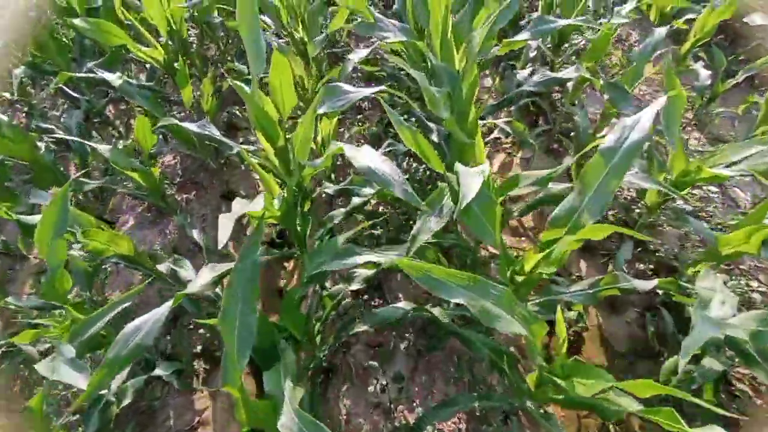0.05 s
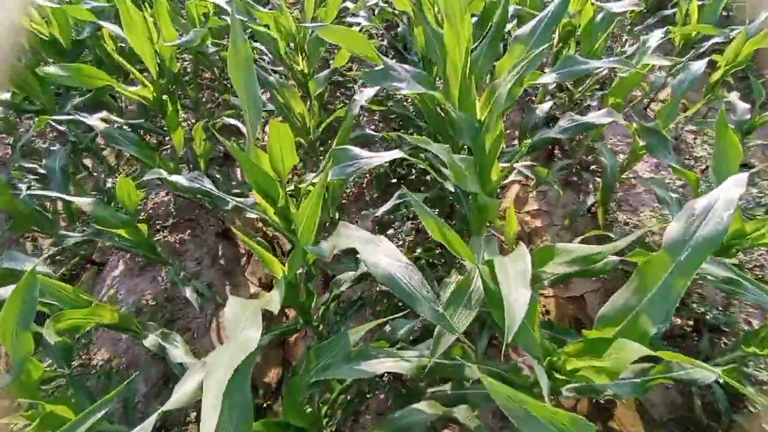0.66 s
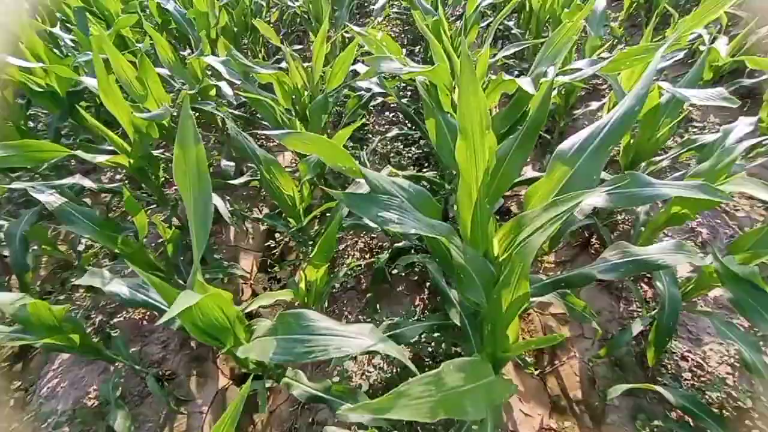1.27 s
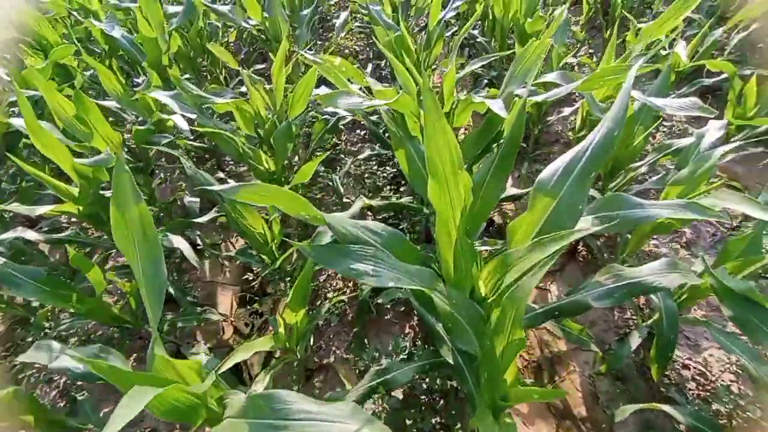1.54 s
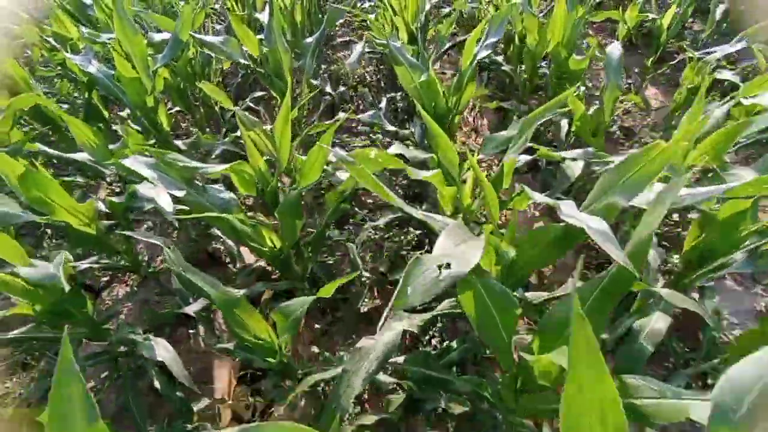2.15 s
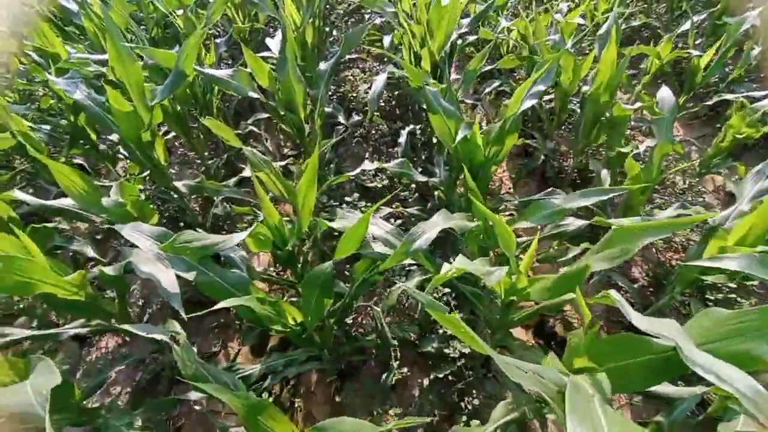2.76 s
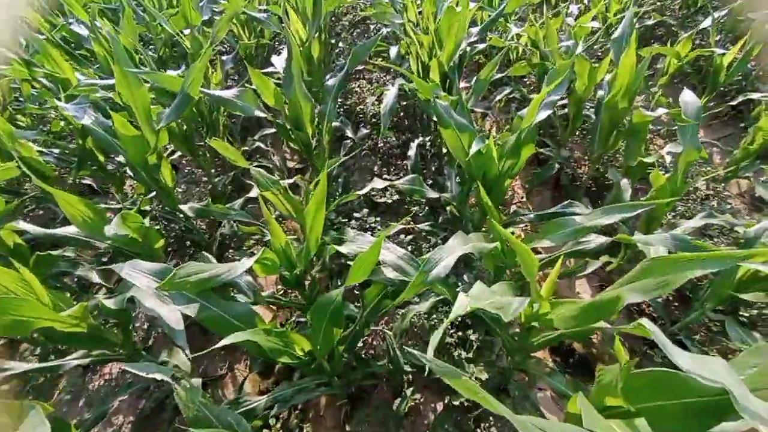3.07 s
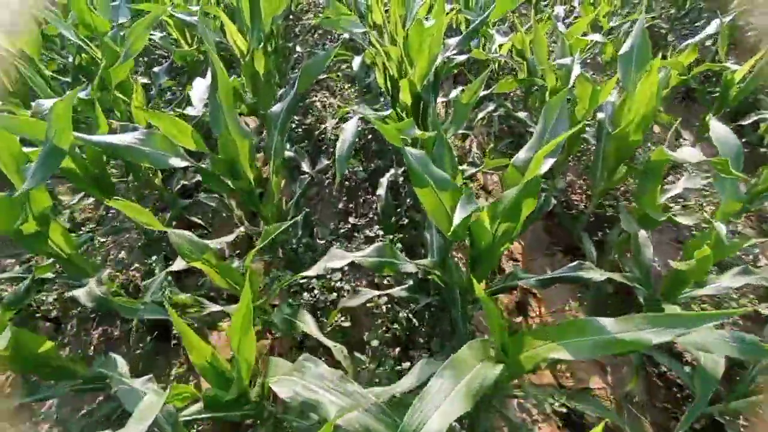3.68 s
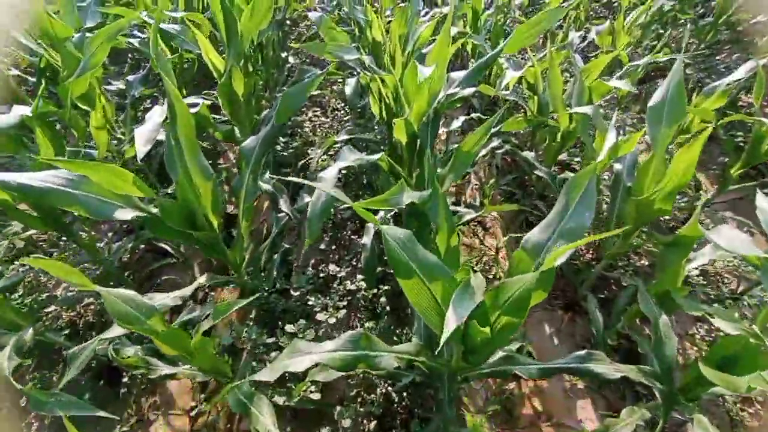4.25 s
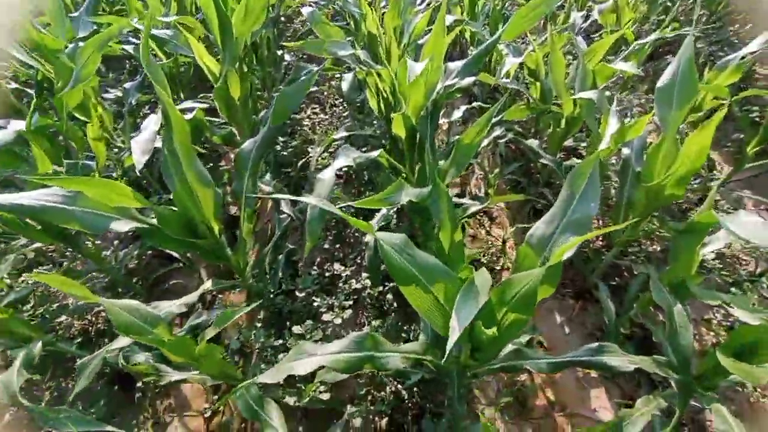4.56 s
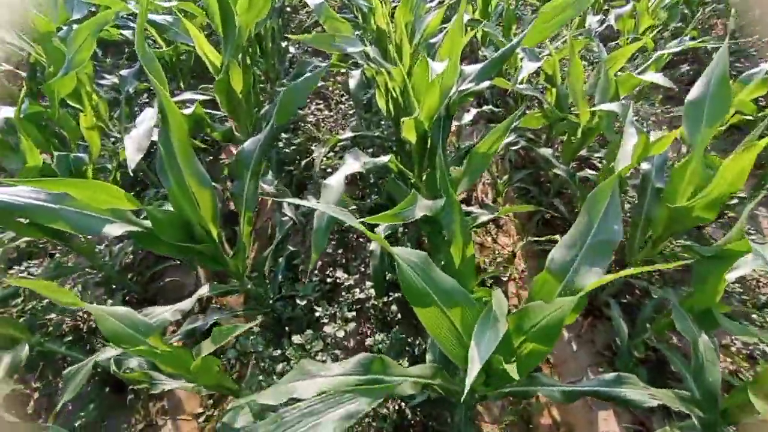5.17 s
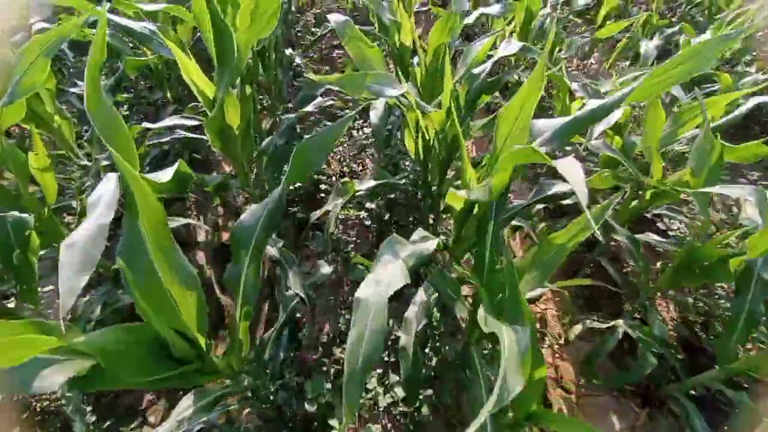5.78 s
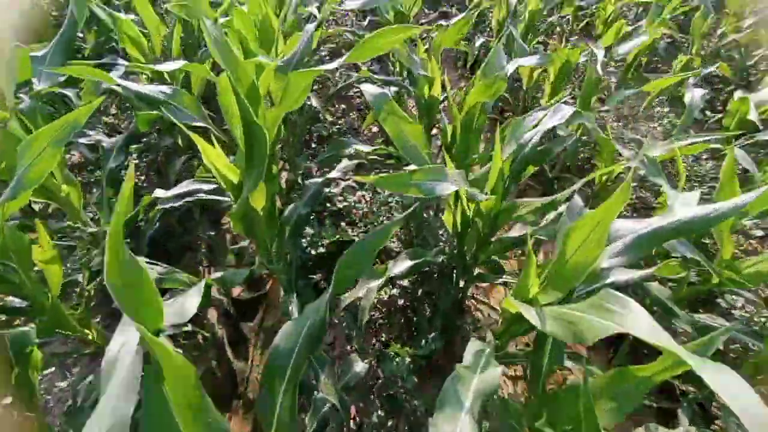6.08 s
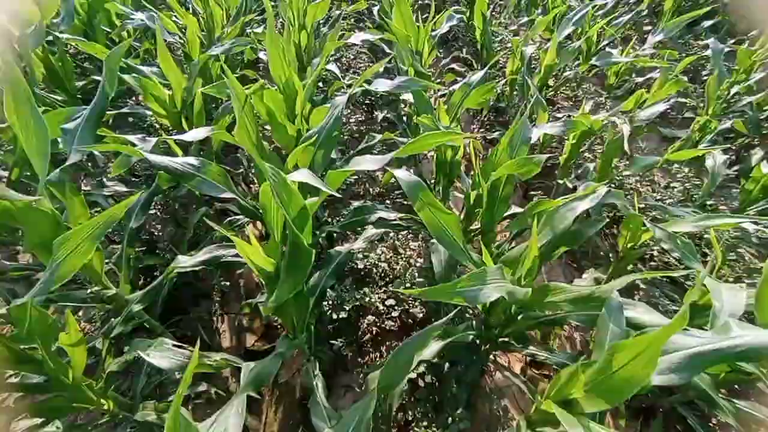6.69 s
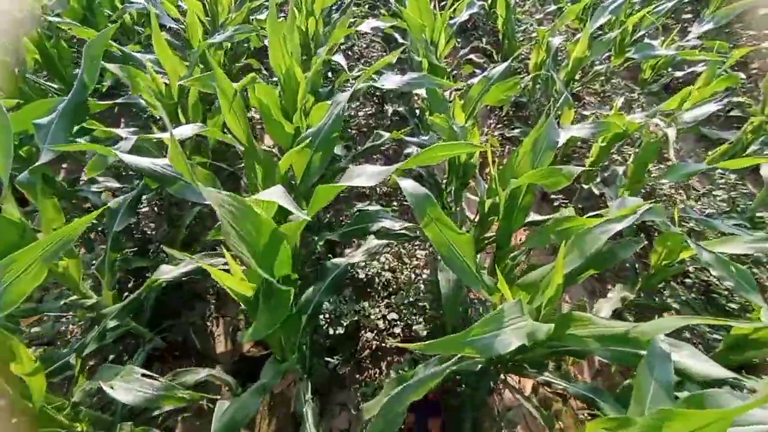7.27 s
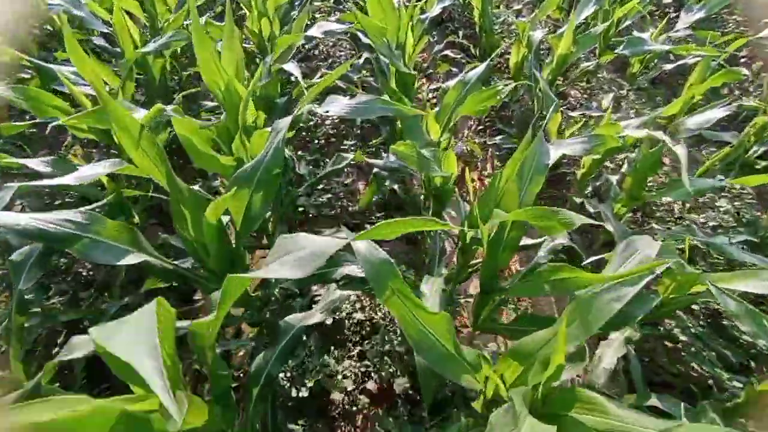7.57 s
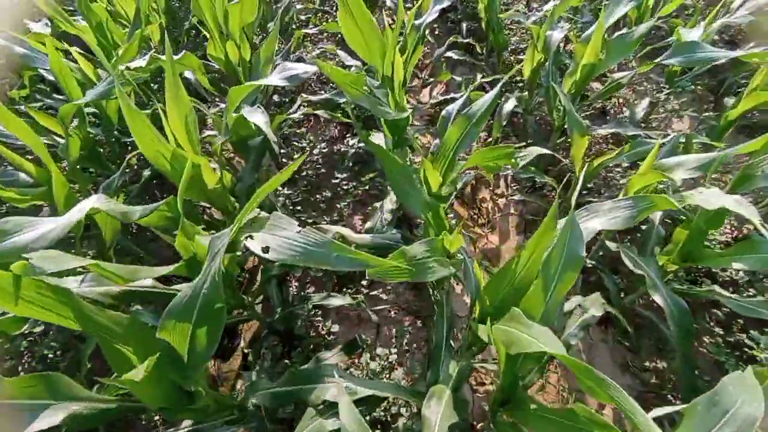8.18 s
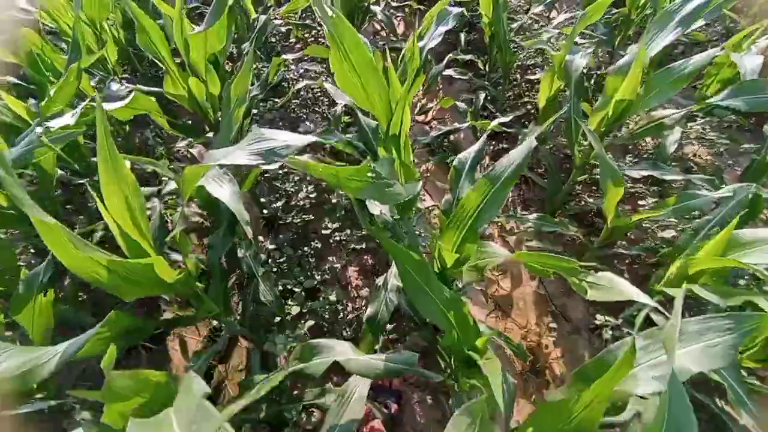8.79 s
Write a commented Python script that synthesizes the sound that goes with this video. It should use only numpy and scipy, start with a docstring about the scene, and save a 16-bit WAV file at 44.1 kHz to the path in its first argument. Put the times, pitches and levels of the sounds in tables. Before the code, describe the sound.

Maize leaves rustle and snap close by as someone walks slowly through young plants, with gusts of wind rumbling on the microphone.

```python
"""Rough maize leaves brush past, close by, as someone walks slowly through rows of young plants.
The leaves slide over clothes and each other, sticking and slipping in tiny clicks that blend into a
rustle. Some catch and drag, some flick free with a snap, and now and then a bent stalk creaks.
Underneath are short, low scuffs, from feet on the dry soil or the dull body of a struck leaf,
and gusts of wind buffet the microphone with a low rumble."""
import sys
import numpy as np
from scipy import signal
from scipy.fft import rfft, irfft, next_fast_len
from scipy.io import wavfile
from scipy.ndimage import uniform_filter1d

SR = 44100
rng = np.random.default_rng(int(sys.argv[2]) if len(sys.argv) > 2 else 0)


def store_pcm(level_fs):
    """Save levels as 16-bit WAV."""
    pcm = np.round(np.clip(level_fs, -1, 1) * 32767).astype(np.int16)
    wavfile.write(sys.argv[1], SR, np.atleast_2d(pcm).T)


N = 398663
TIME = np.arange(N) / SR

# A leaf brushes past: (start [s], length [s], rub level [dB], rasp compared with rub [dB],
# hiss compared with rub [dB], lowest ringing pitch of the leaf [Hz])
LEAF_BRUSHES = [(-0.06, 0.2, -50.5, 3.5, -2, 820), (0.119, 0.48, -44.5, 1.5, -1.5, 960),
                (0.573, 0.25, -53, -20, 2, 1310), (0.718, 0.1, -47, -1.5, -3.5, 1130),
                (0.841, 0.14, -49.5, -1, -1, 1190), (0.978, 0.22, -44, 0, -4, 1120),
                (1.203, 0.11, -49, -6.5, -2, 1220), (1.37, 0.51, -54.5, 0.5, -0.5, 1270),
                (1.609, .18, -43.5, -2.5, -4, 1210), (1.784, 0.31, -49, -2.5, -2.5, 1150),
                (2.07, 0.64, -49, 0, -1.5, 1390), (2.329, 0.26, -46.5, -1, 0.5, 1340),
                (2.607, 0.47, -50.5, -2, 1, 1460), (2.88, 0.27, -47.5, -0.5, -0.5, 1270),
                (3.135, 0.44, -50, -2, -0.5, 1300), (3.41, 0.18, -49, 0, 1.5, 1350),
                (3.62, 0.37, -52.5, -5.5, 0, 1310), (4.054, 0.13, -52.5, -6.5, -3, 1240),
                (4.254, 0.34, -52.5, -5, -1.5, 960), (4.59, 0.23, -52.5, -5, -2.5, 1220),
                (4.84, 0.27, -56.5, -7.5, -1.5, 1120), (5.222, 0.52, -58, -9.5, -2, 1170),
                (5.45, 0.77, -50.5, 0, -0.5, 1115), (5.887, 0.42, -47.5, -1, -1.5, 1370),
                (6.304, 0.44, -50, -2.5, -1, 1430), (6.698, 0.13, -47, -0.5, -2, 960),
                (6.835, 0.41, -51.5, -5.5, -1.5, 1340), (7.27, 0.25, -56, -5.5, 1.5, 1300),
                (7.481, 0.29, -53, -2, -1, 1090), (7.638, 0.31, -51.5, 2.5, -2.5, 1390),
                (7.814, 0.052, -46.5, -4, -2, 1350), (7.961, 0.039, -51, 4.5, 2, 1910),
                (8.017, 0.3, -47.5, -0.5, -1.5, 1080), (8.295, 0.21, -46, -4, -1.5, 1160),
                (8.478, 0.16, -49, 1.5, -2, 960), (8.636, 0.4, -49, 0, 0, 1400)]
# A leaf flicks free: (time [s], peak level [dB], pitch [Hz], crispness [0 to 1])
LEAF_FLICKS = [(0.625, -25.5, 3300, 0.18), (0.7793, -29, 3670, 0.3), (1.043, -30, 3700, 0.1),
               (1.555, -25, 3840, 0.56), (1.805, -36.5, 2360, 0.2), (1.8484, -28.5, 3700, 0.1),
               (1.865, -35.5, 1440, 0.5), (2.0146, -29, 6500, 1), (2.0437, -26, 5500, 1),
               (2.084, -29, 3130, 0.9), (2.17, -30, 4370, 0.1), (2.339, -34, 2070, 0.95),
               (2.414, -19, 4350, 0.19), (2.469, -24.5, 3140, 0.2), (3.53, -27, 3960, 0.6),
               (4.8017, -31, 3100, 0), (6.27, -29, 3990, 0.9), (7.1884, -33, 3780, 0),
               (7.2379, -31.5, 2360, 0.2), (7.6994, -29.5, 2420, 0.26), (8.772, -36, 2080, 0.6)]
# A leaf catches and drags: (start [s], length [s], level [dB], pitch [Hz])
LEAF_DRAGS = [(0.878, 0.0045, -45.5, 1500), (1.074, 0.02, -39, 2580), (1.129, 0.038, -38, 3720),
              (1.18, 0.018, -46, 1290), (1.699, 0.0056, -42, 1700), (1.929, 0.014, -41.5, 3640),
              (1.991, 0.0088, -46, 5000), (2.021, 0.0065, -40.5, 4480), (3.523, 0.025, -40.5, 5560),
              (3.677, 0.042, -48, 6900), (4.45, 0.1, -48.5, 3270), (4.793, 0.006, -48.5, 3100),
              (5.05, 0.007, -47.5, 3240), (5.129, 0.0053, -50, 3730), (5.23, 0.0061, -49, 5800),
              (5.491, 0.0077, -44.5, 2520), (6.153, 0.061, -42.5, 2840), (6.781, 0.023, -43, 1980),
              (6.932, 0.046, -50.5, 6660), (7.514, .004, -47.5, 7460), (7.929, 0.015, -39.5, 3630),
              (8.041, 0.0088, -38.5, 3570), (8.103, 0.0062, -39.5, 4240), (8.195, 0.017, -40.5, 1410),
              (8.335, 0.01, -36, 3300), (8.373, 0.0069, -32.5, 2630), (8.39, 0.031, -32.5, 2750),
              (8.474, 0.028, -41, 4070), (8.746, 0.0049, -42, 1920)]
# A stalk is pushed aside: (start [s], length [s], level [dB])
STALK_CREAKS = [(2.463, 0.0063, -49), (8.205, .035, -61), (8.384, 0.03, -50)]
# The notes a stalk rings at: (pitch [Hz], relative level [dB])
STALK_NOTES = [(660, 1), (1040, -0.5)]
# A short, low scuff, from a foot on the soil or the dull body of a struck leaf:
# (start [s], length [s], level [dB])
LOW_SCUFFS = [(-0.01, 0.2, -58), (0.208, 0.43, -55), (0.747, 0.065, -52), (1.52, 0.42, -61),
              (2.462, 0.099, -58), (2.825, 0.13, -52.5), (2.93, 0.22, -62), (6.724, 0.21, -66.5)]
# A gust reaches the microphone: (start [s], length [s], level [dB])
WIND_GUSTS = [(0.01, 0.16, -60.5), (0.224, 0.071, -53.5), (0.83, 0.37, -65.5), (1.994, 0.25, -48),
              (2.302, 0.2, -59.5), (3.103, 0.052, -51), (3.33, 0.47, -46), (3.475, 0.23, -33.5),
              (3.824, 0.17, -41.5), (4.018, 0.081, -47), (4.164, 0.17, -54), (4.456, 0.032, -52),
              (4.534, 0.035, -54), (5.438, 0.29, -61), (5.775, 0.044, -52), (5.868, 0.22, -46),
              (6.077, 0.24, -46.5), (6.498, 0.24, -56), (7.042, 0.082, -54.5), (7.408, 0.11, -53),
              (7.676, 0.11, -66), (8.803, 0.17, -50.5)]
# One swirl of air hits the microphone: (time [s], peak level [dB], pitch [Hz])
WIND_THUMPS = [(2.094, -33.5, 118), (2.136, -33, 113), (3.542, -25, 250), (3.611, -21, 161),
               (3.69, -26, 188), (3.943, -27, 115), (6.212, -33, 120), (8.863, -33, 93)]
# The tone of each sound, from low to high: (frequency [Hz], relative level [dB])
RASP_TONE = [(400, -22.5), (800, -2), (1300, 0.5), (2100, 2), (2700, 2), (3500, -2.5), (6000, -74.5)]  # low part of the rustle
RUB_TONE = [(1500, -23), (2400, -10.5), (2900, -2.5), (3700, 1.5), (4500, 9.5), (5100, 5.5), (6500, -27.5),
            (8200, -23.5), (9500, -50)]  # middle part of the rustle
HISS_TONE = [(2500, -19), (4200, 1.5), (5100, 2), (6000, 1.5), (7800, 4), (8500, -3), (9300, -14),
             (11500, -13.5), (12700, -5.5), (14000, -9.5), (16000, -9.5)]  # high part, from the leaf hairs
SNAP_TONE = [(150, -77), (600, -11.5), (1300, 3), (4200, -2), (5200, -4.5), (7800, 5.5), (9500, -4.5),
             (13000, 2), (16000, -4)]  # a leaf letting go
SCUFF_TONE = [(100, -1.5), (250, -25.5), (420, -10), (650, -4), (1000, -4.5), (1600, -18.5)]  # a low, dull scuff
BIG_SWIRL_TONE = [(20, -49), (35, -6), (55, 7), (75, 12.5), (125, 9), (200, -5), (300, -42.5), (600, -66)]  # deep wind rumble
SMALL_SWIRL_TONE = [(80, -5.5), (180, 21.5), (320, 1.5), (480, -22.0), (900, -67)]  # higher rumble

FIRM_DB = -47  # rub level of a firm brush
STIR_RASP_DB, STIR_RUB_DB, STIR_HISS_DB = -81, -71, -63.5  # the plants around keep stirring faintly
RIB_HZ, RIB_WIDTH_HZ, RIB_DB = 3100, 810, -16  # scrape of the stiff rib down the middle of a leaf
GAP_HZ, GAP_WIDTH, GAP_DRIFT, GAP_DB = 2700, .06, .06, -7  # width and drift are shares of the pitch
STEP = 64  # samples between the points of a loudness curve


def leaves():
    """Sliding leaves rustle: the same friction drives a low rasp, a middle rub and a high hiss."""
    starts, lengths, rub_db, rasp_db, hairs_db, leaf_hz = np.transpose(LEAF_BRUSHES)
    power = strokes(starts, lengths, attack_s=.04, release_s=0.053, swell_db=1.5)
    pressure = total_gain(power, rub_db, STIR_RUB_DB)
    drive = light_touch(leaf_friction(), pressure)
    # the leaves that press hardest decide how low the rasp reaches
    weight = amp(rub_db)[:, None] ** 2 * (power + 1e-9)
    lowest_hz = np.interp(TIME, TIME[::STEP], leaf_hz @ weight / weight.sum(0))
    rasp = steady(cut_below(colour(drive, RASP_TONE), lowest_hz), 0.088)
    rasp *= total_gain(power, rub_db + rasp_db, STIR_RASP_DB)
    # the rib scrapes most under firm pressure, and answers a little late
    rib = steady(ring_twice(drive, RIB_HZ, RIB_WIDTH_HZ), 0.51)
    firmness = np.minimum(pressure / amp(FIRM_DB), 1) ** 0.46
    rub = pressure * (steady(colour(drive, RUB_TONE), 0.82) + amp(RIB_DB) * firmness * np.roll(rib, 150))
    hiss = total_gain(power, rub_db + hairs_db, STIR_HISS_DB) * steady(colour(drive, HISS_TONE), 0.12)
    # the leaves sound from different places, a few samples apart
    return rasp + np.roll(rub, 23) + np.roll(hiss, 51)


def leaf_friction():
    """Rough leaves stick and slip thousands of times a second, with catches and crinkles on top."""
    sliding = slips(per_s=9000, spread_db=1.0) * amp(0.96 * wander(rate_hz=30.0))
    # narrow peaks inside broad ones, shifting as other leaves take over
    sliding = shifting_peaks(sliding, depth_db=4.5, width_hz=90, hold_s=0.065)
    sliding = evened(shifting_peaks(sliding, depth_db=3.0, width_hz=770, hold_s=0.032))
    # a catch lets go at once and the slips that follow die away
    t = np.arange(2048) / SR
    catches = signal.oaconvolve(abs(slips(per_s=60, spread_db=1.5)), np.exp(-t / 0.0052))[:N]
    crackle = amp(-7.5) * evened(catches * rng.standard_normal(N))
    pops = amp(-13.0) * crinkles(per_s=330, spread_db=3.5)
    ticks = amp(-22.5) * slips(per_s=43, spread_db=1.5)
    return sliding + crackle + pops + ticks


def crinkles(per_s, spread_db):
    """Little folds pop in the leaves, at eight different pitches."""
    folds = [evened(ring(slips(per_s / 8, spread_db), hz, width_hz=.6 * hz)) * np.sqrt(hz)
             for hz in np.geomspace(1300, 11000, 8)]
    return evened(sum(folds))


def light_touch(x, pressure):
    """Under a light touch few leaves ring, so shifting gaps open in the tone and it sounds hollow."""
    lightness = np.clip((FIRM_DB - 20 * np.log10(pressure)) / 8, 0, 1)  # full at 8 dB below firm
    few_leaves = shifting_peaks(x, depth_db=5 * lightness, width_hz=170, hold_s=.1)
    hz, t, bands = split_bands(few_leaves)
    centre_hz = GAP_HZ * (1 + GAP_DRIFT * np.interp(t, TIME, wander(rate_hz=4)))
    wide_gap = np.exp(-((hz[:, None] / centre_hz - 1) / GAP_WIDTH) ** 2)
    return join_bands(bands * amp(GAP_DB * np.interp(t, TIME, lightness) * wide_gap))


def cut_below(x, lowest_hz):
    """A leaf gives off very little sound below its lowest ringing pitch."""
    hz, t, bands = split_bands(x, size=512)
    passed = 1 / (1 + (np.interp(t, TIME, lowest_hz) / (hz[:, None] + 1)) ** 11)
    return join_bands(bands * (amp(-26) + passed), size=512)


def flicks():
    """A leaf creaks as it bends, snaps free in a few quick slips, and crackles as it shivers."""
    out, t = np.zeros(N), np.arange(-700, 3000) / SR  # the snap comes at t = 0
    after = np.maximum(t, 0)
    bending = 0.09 * np.exp(np.minimum(t, 0) / 0.0048)
    shivering = 0.13 * np.exp(-after / 0.0079) + 0.057 * np.exp(-after / 0.033)
    shape = np.where(t < 0, bending, shivering)
    for s, db, hz, crisp in LEAF_FLICKS:
        cycles = hz * after
        click = np.sin(2 * np.pi * cycles) * cycles * np.exp(1 - cycles) + 3 * crisp * (t == 0)
        # two weaker slips follow within 1.4 ms
        delays = rng.uniform(.5, 1, 2) * [.5, 1]
        late_slips = sum(np.exp(-delay) * np.roll(click, int(delay * .0014 * SR)) for delay in delays)
        snap = colour(click + late_slips, SNAP_TONE)
        grit = rng.standard_normal(len(t))
        leaf = evened(ring(ring(grit, hz, width_hz=750), hz, width_hz=8100))
        crackle = colour(shape * (leaf + crisp * grit), SNAP_TONE)
        add(out, s + t[0], amp(db) * (snap / abs(snap).max() + crackle))
    return out


def drags():
    """A taut leaf zips along in uneven slips; a gentle pull rings rounder than a hard one."""
    out = np.zeros(N)
    for s, length_s, db, hz in LEAF_DRAGS:
        t = np.arange(int((length_s + .02) * SR)) / SR
        slip_count = np.cumsum(420 * (1 + 4 * rng.standard_normal(len(t)))) / SR
        bursts = (.3 + np.exp(-(slip_count % 1) / .3)) * rng.standard_normal(len(t))
        leaf = ring_twice(bursts, hz, width_hz=hz * 0.59 * amp(db - FIRM_DB) ** 0.36)
        shape = rise_and_fade(t, length_s, attack_s=0.0012, release_s=0.0031)
        add(out, s, amp(db) * shape * steady(colour(leaf + 0.078 * bursts, SNAP_TONE), 0.0065))
    return out


def stalks():
    """Friction makes a bent stalk ring at its low notes for a moment: a dull creak."""
    out, t = np.zeros(N), np.arange(SR // 5) / SR
    for s, length_s, db in STALK_CREAKS:
        grit = rng.standard_normal(len(t))
        body = sum(amp(note_db) * evened(ring_twice(grit, hz, width_hz=175))
                   for hz, note_db in STALK_NOTES)
        shape = rise_and_fade(t, length_s, attack_s=.003, release_s=.015)
        add(out, s, amp(db) * shape * steady(body, .02))
    return out


def scuffs():
    """Soil grinds under a foot, or a struck leaf rings low and dull, over a faint shuffle."""
    starts, lengths, level_db = np.transpose(LOW_SCUFFS)
    power = strokes(starts, lengths, attack_s=0.0091, release_s=0.039, swell_db=11)
    grit = shifting_peaks(slips(per_s=1500, spread_db=3), depth_db=4.2, width_hz=110, hold_s=.06)
    return total_gain(power, level_db, floor_db=-79.5) * steady(colour(grit, SCUFF_TONE), 0.1)


def wind():
    """Swirls of air flutter at the microphone; strong gusts break into smaller, higher-pitched ones."""
    starts, lengths, level_db = np.transpose(WIND_GUSTS)
    power = strokes(starts, lengths, attack_s=.028, release_s=.028, swell_db=3)
    force = total_gain(power, level_db, floor_db=-77.5)
    flutter = amp(3 * wander(rate_hz=22))
    big = steady(flutter * colour(rng.standard_normal(N), BIG_SWIRL_TONE), 0.068)
    small = evened(colour(rng.standard_normal(N), SMALL_SWIRL_TONE))
    breakup = np.minimum(force / amp(-44.5), 1) ** 4.3  # complete in gusts of -44.5 dB or more
    out = force * (big + amp(-7.0) * breakup * flutter * small)
    t = np.arange(-.03, .03, 1 / SR)
    for s, db, hz in WIND_THUMPS:
        # the air pressure swings two or three times as one swirl passes
        swing = np.sin(2 * np.pi * (hz * t + rng.random()))
        add(out, s + t[0], amp(db) * swing / np.cosh(3.16 * hz * t))
    return out


def slips(per_s, spread_db):
    """Surfaces stick and slip in tiny clicks: many small, a few large."""
    size = amp(spread_db * np.minimum(rng.exponential(1, N), 4.5))
    return evened(size * rng.choice([-1, 1], N) * (rng.random(N) < per_s / SR))


def shifting_peaks(x, depth_db, width_hz, hold_s):
    """Each thing that touches rings in its own way, so peaks come and go, weaker in the treble."""
    hz, t, bands = split_bands(x)
    # a random pattern, smoothed along time and across pitch, with its broadest humps taken out
    along, across = np.fft.fftfreq(len(t), t[1])[:, None], np.fft.fftfreq(len(hz), hz[1])
    smooth = np.exp(-(along * hold_s * 2) ** 2 - (across * width_hz * 2) ** 2)
    smooth *= 1 - np.exp(-(across * 2500) ** 2)
    noise = rng.standard_normal((len(t), len(hz)))
    pattern = evened(np.fft.ifft2(np.fft.fft2(noise) * smooth).real).T
    pattern = np.minimum(pattern, 2 * np.tanh(pattern / 2))  # blunt peaks, deep valleys
    gain_db = np.interp(t, TIME, depth_db * np.ones(N)) * pattern / (1 + (hz[:, None] / 4500) ** 2)
    return join_bands(bands * amp(gain_db))


def ring(x, hz, width_hz):
    """Make a sound ring at one pitch; a wider ring dies away sooner."""
    decay, turn = np.exp(-np.pi * width_hz / SR), 2 * np.pi * min(hz, SR / 2.2) / SR
    return signal.lfilter([1 - decay, 0, decay - 1], [1, -2 * decay * np.cos(turn), decay * decay], x)


def ring_twice(x, hz, width_hz):
    """Two rings in a row pick out the pitch more clearly."""
    return ring(ring(x, hz, width_hz), hz, width_hz)


def colour(x, tone, size=4096):
    """Filter a sound with a tone table, so that clicks keep their sharp start."""
    tone_hz, tone_db = np.transpose(tone)
    hz = abs(np.fft.fftfreq(size, 1 / SR))
    log_gain = np.log(amp(np.interp(np.log(hz + 1), np.log(tone_hz), tone_db)))
    click_response = np.fft.ifft(np.exp(np.conj(signal.hilbert(log_gain)))).real
    return signal.oaconvolve(x, click_response[:size // 2])[:len(x)]


def rise_and_fade(t, length_s, attack_s, release_s):
    """A loudness curve that rises, holds until length_s, then fades."""
    return np.clip(t / attack_s, 0, 1) * np.exp(-np.maximum(t - length_s, 0) / release_s)


def strokes(starts, lengths, attack_s, release_s, swell_db):
    """One power curve for each brush, scuff or gust, swelling towards its middle."""
    t, length = TIME[::STEP] - starts[:, None], lengths[:, None]
    swell = amp(-swell_db * (2 * np.clip(t / length, 0, 1) - 1) ** 2)
    return (swell * rise_and_fade(t, length, attack_s, release_s)) ** 2


def total_gain(power, levels_db, floor_db):
    """Join overlapping strokes into one loudness curve over a quiet floor."""
    return np.interp(TIME, TIME[::STEP], np.sqrt(amp(levels_db) ** 2 @ power + amp(floor_db) ** 2))


def wander(rate_hz):
    """A smooth random drift with a typical size of one."""
    size = next_fast_len(N, True)
    hz = np.fft.rfftfreq(size, 1 / SR)
    return evened(irfft(rfft(rng.standard_normal(size)) / (1 + (hz / rate_hz) ** 4), size)[:N])


def split_bands(x, size=1024):
    """Split a sound by pitch and time: returns frequencies, times and bands."""
    return signal.stft(x, SR, nperseg=size, noverlap=size * 3 // 4)


def join_bands(bands, size=1024):
    """Turn the bands back into a sound."""
    return signal.istft(bands, SR, nperseg=size, noverlap=size * 3 // 4)[1][:N]


def steady(x, span_s):
    """Hold the level near one, keeping only changes quicker than span_s."""
    return x / np.sqrt(abs(uniform_filter1d(x ** 2, max(int(span_s * SR), 1))) + 1e-12)


def evened(x):
    """Scale a whole signal to an average level of one."""
    return x / np.sqrt(np.mean(x ** 2) + 1e-20)


def amp(db):
    """Turn decibels into a multiplier."""
    return 10 ** (np.asarray(db) / 20)


def add(mix, s, sound):
    """Mix a sound in, starting at s seconds."""
    part = mix[max(round(s * SR), 0):][:len(sound)]
    part += sound[:len(part)]


def scene():
    """Plants, scuffs and wind together in one channel."""
    return (leaves() + flicks() + drags() + stalks() + scuffs() + wind())[None]


def record(dry):
    """The microphone cuts the bass below 50 Hz and the recorder cuts the treble above 16000 Hz."""
    thin = signal.sosfilt(signal.butter(4, 50, "highpass", fs=SR, output="sos"), dry)
    treble_cut = signal.firwin(511, 16000, window=("kaiser", 9), fs=SR)
    return signal.oaconvolve(thin, treble_cut[None], "same")


dry = scene()
out = record(dry)
store_pcm(out)
```